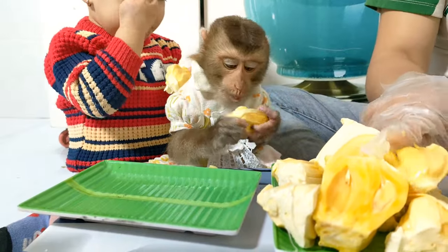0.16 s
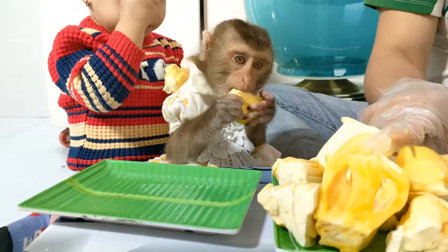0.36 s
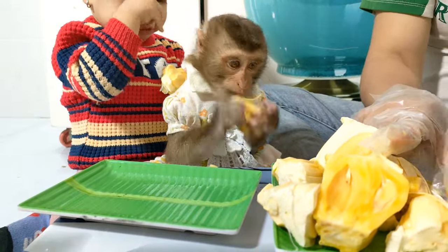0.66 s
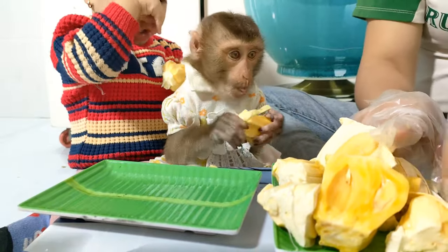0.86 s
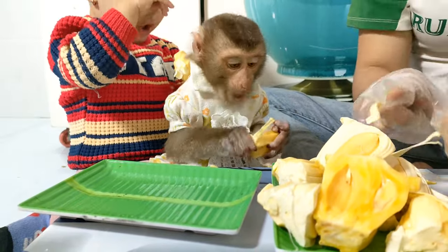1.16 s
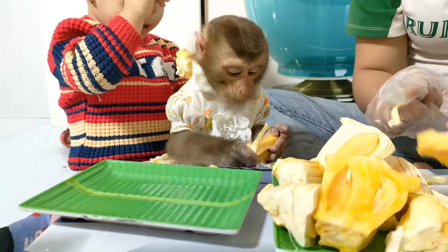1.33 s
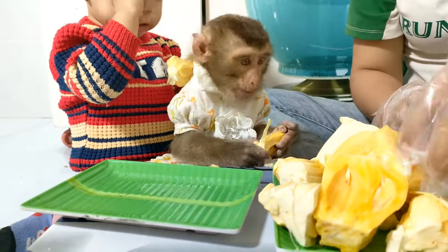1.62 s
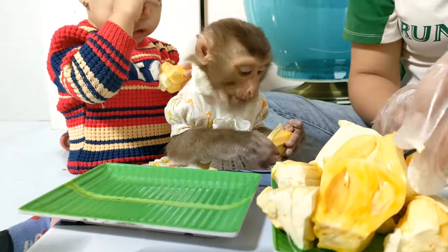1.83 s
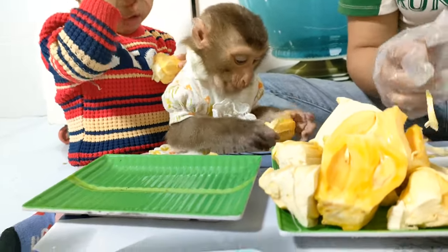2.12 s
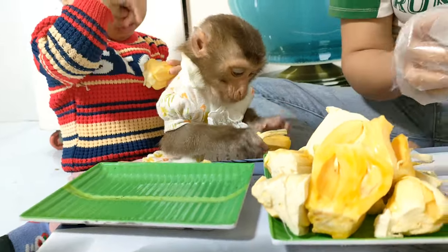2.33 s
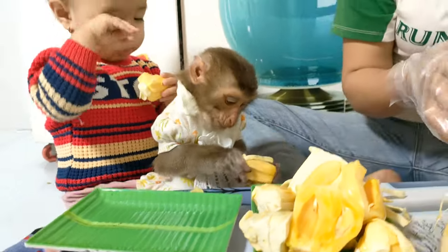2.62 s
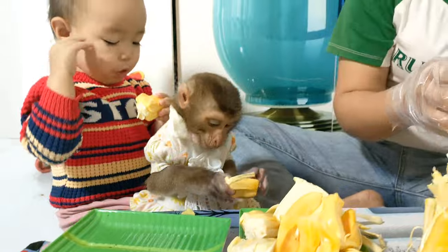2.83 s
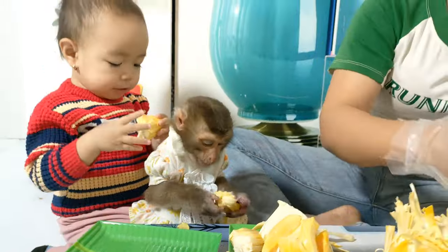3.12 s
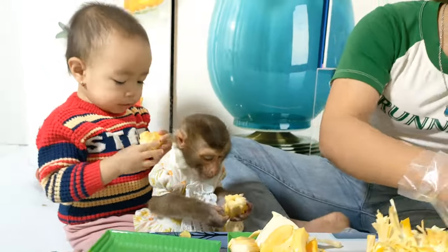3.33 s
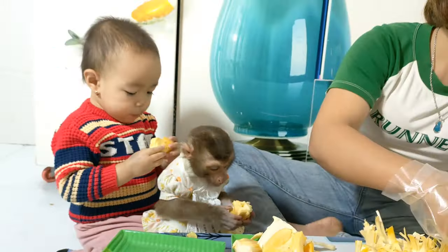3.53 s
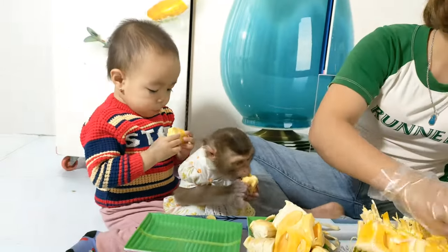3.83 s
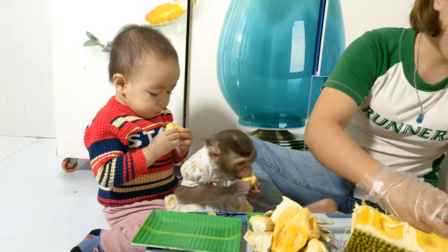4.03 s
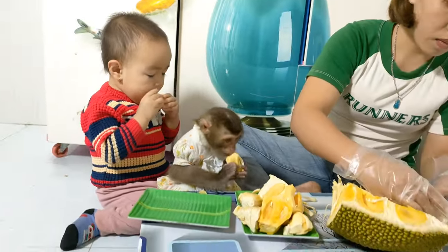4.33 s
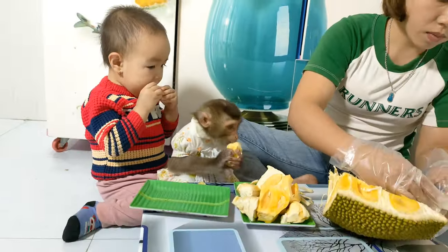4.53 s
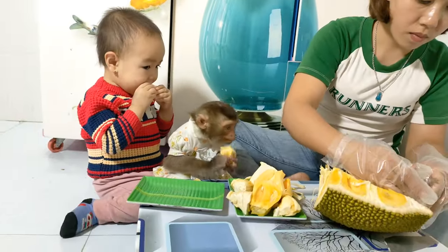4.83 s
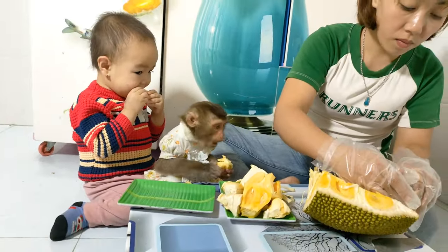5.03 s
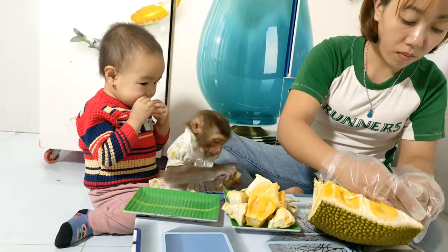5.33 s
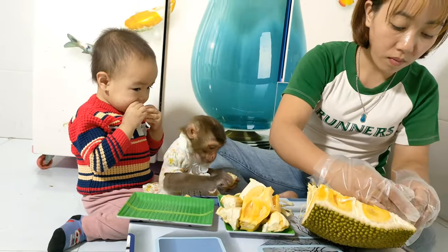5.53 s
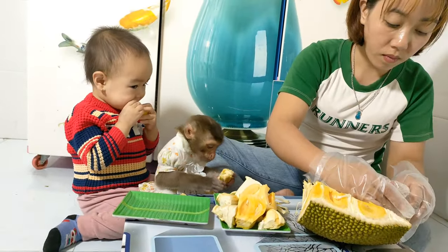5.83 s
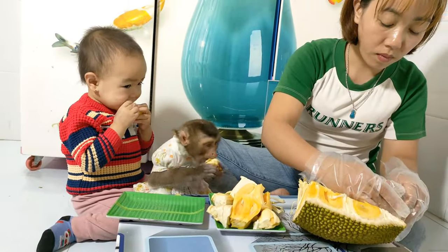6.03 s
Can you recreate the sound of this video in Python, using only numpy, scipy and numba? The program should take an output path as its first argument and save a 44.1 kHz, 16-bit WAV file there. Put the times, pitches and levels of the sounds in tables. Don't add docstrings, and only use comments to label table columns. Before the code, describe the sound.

Irregular crackling of thin plastic film dominates, bright in the low treble but with little high air. Sharp creases snap over softer rustling, fruit and tray bump dully, and sticky fibres release with small pops. The handling is busiest around two to two and a half seconds, then comes in spaced bursts drifting right and quietens before a final crumple. Quiet tiled room, small stereo recorder nearby.

```python
import sys
import numpy as np
from scipy import signal
from scipy.fft import rfft, irfft
from scipy.io import wavfile
from scipy.ndimage import uniform_filter1d
from numba import njit

SR = 44100
rng = np.random.default_rng(int(sys.argv[2]) if len(sys.argv) > 2 else 0)


def gain_from_db(level_db):
    decades = np.asarray(level_db, float) / 20
    return 10 ** decades


def persist_wave(psi):
    counts = np.round(np.clip(psi, -1, 1) * 32767).astype(np.int16)
    wavfile.write(sys.argv[1], SR, np.atleast_2d(counts).T)


N = 271656


def colour(x, points):
    hz, db = np.transpose(points)
    grid = np.linspace(1, SR / 2, 2049)
    ceps = irfft(np.interp(np.log(grid), np.log(hz), db) * np.log(10) / 20)
    ceps[1:2048] *= 2
    ceps[2049:] = 0
    impulse = irfft(np.exp(rfft(ceps)))
    return signal.fftconvolve(x, impulse[None], axes=1)[:, :N]


def band(x, lo_hz, hi_hz):
    sos = signal.butter(2, [lo_hz, min(hi_hz, .45 * SR)], "band", fs=SR, output="sos")
    return signal.sosfilt(sos, x)


def walk(rate):
    hold = int(SR / rate)
    steps = np.repeat(rng.standard_normal(N // hold + 1), hold)
    return uniform_filter1d(steps, hold)[:N]


@njit
def rings(s, hz, t60, size, rise_cycles):
    out = np.zeros(N)
    for k in range(len(s)):
        turn = np.exp(2j * np.pi * hz[k] / SR - np.log(1000) / (t60[k] * SR))
        rise = np.exp(-hz[k] / (rise_cycles * SR))
        lack = 1.
        z = size[k] + 0j
        first = max(int(s[k] * SR), 0)
        for j in range(first, min(N, first + int(t60[k] * SR))):
            out[j] += z.imag * (1 - lack)
            z *= turn
            lack *= rise
    return out


def both_ears(s, hz, t60, size, pan_db, lag_s, detune, rise_cycles):
    chance = rng.standard_normal((len(s), 4)).T
    left_hz = hz * (1 + detune * chance[1])
    right_hz = hz * (1 + detune * chance[3])
    left = rings(s + lag_s * chance[0], left_hz, t60, size * gain_from_db(pan_db / 2), rise_cycles)
    right = rings(s + lag_s * chance[2], right_hz, t60, size * gain_from_db(-pan_db / 2), rise_cycles)
    return np.array([left, right])


def place_db(s):
    # t/s, left minus right/dB
    positions = [
        (0.0, 0),
        (2.3, 1),
        (3.5, -3.5),
        (4.0, -3),
        (5.5, -4),
        (6.16, -9),
    ]
    return np.interp(s, *np.transpose(positions))


def hands():
    # start t/s, length/s, level/dB, tautness/dB
    grips = [(0.0, 0.011, -37.5, -5), (0.137, 0.12, -40, -5), (0.306, 0.055, -39.5, -8.5),
             (0.389, 0.18, -36.5, -6.5), (0.685, 0.1, -39, -9), (0.83, 0.032, -33, -7),
             (0.978, 0.036, -36, -7.5), (1.224, 0.044, -42, -5), (1.366, 0.17, -41.5, -4.5),
             (1.606, 0.22, -44, -9.5), (1.78, 0.17, -44.5, -10.5), (1.987, 0.12, -40.5, -14),
             (2.166, 0.054, -31.5, -20), (2.225, 0.115, -30.5, -14.5), (2.375, 0.32, -40.5, -29),
             (2.579, 0.11, -31, -20), (2.79, 0.28, -40, -16.5), (3.054, 0.08, -37, -10.5),
             (3.168, 0.31, -36, -14.5), (3.54, 0.34, -42.5, -13.5), (3.84, 0.11, -31.5, -11),
             (3.984, 0.16, -35.5, -11.5), (4.187, 0.61, -46, -8.5), (4.516, 0.14, -38.5, -6),
             (4.736, 0.19, -42.5, -8.5), (4.94, 0.18, -46.5, -9.5), (0.572, 0.027, -41.5, -4),
             (5.16, 0.03, -41, -9.5), (5.203, 0.041, -39, -8.5), (5.3, 0.18, -45.5, -4),
             (5.405, 0.18, -45.5, -8.5), (6.093, .04, -56.5, 8), (6.129, 0.049, -35.5, -7.5)]
    attack_s, swell_share, sag_db, release_db_per_s, rest_db = 0.016, 0.18, -0.5, -160, -58
    t = np.arange(0, N, 64) / SR
    start, length, level_db, taut_db = np.array(grips).T[:, :, None]
    since = t - start
    sag = sag_db * np.clip(since / length, 0, 1)
    release = release_db_per_s * np.clip(since - length, 0, None)
    swell = np.clip(since / (attack_s + swell_share * length) + 0.66, 0, 1)
    power = (swell * gain_from_db(level_db + sag + release)) ** 2 + gain_from_db(rest_db) ** 2 / len(grips)
    total = power.sum(0)
    curves = 10 * np.log10(total), (power * taut_db).sum(0) / total
    return [np.interp(np.arange(N) / SR, t, c) for c in curves]


def rustle():
    # f/Hz, level/dB
    mic_response = [(180, -16), (300, -17), (366, -19.5), (720, -15), (937, -5.5), (1510, 1), (2350, 2.5),
                    (2600, 3.5), (3940, 3), (5850, -10.5), (7140, -24), (7880, -30.5), (11100, -30.5),
                    (13600, -40.5), (15500, -37)]
    buckles_per_s = 4000
    level_db, taut_db = hands()
    crisp_db = -23 + 0.34 * taut_db
    flesh_db = -13 - 0.037 * (level_db + 69)
    chance = rng.random((buckles_per_s * N // SR, 4)).T
    at = (chance[0] * N).astype(int)
    hz = 150 + 14500 * chance[1] ** 1.584
    t60 = (5 + 12 * chance[2]) / hz
    pan_db = place_db(at / SR) * np.clip(hz / 2500, 0, 1)
    burst_db = -1.5 * np.log(1 - chance[3]) + 1.87 * walk(140)[at] + 0.91 * walk(24.19)[at]
    size = hz ** 0.73 * gain_from_db(np.minimum(burst_db, 13))
    film = colour(both_ears(at / SR, hz, t60, size, pan_db, .00012, 0.054, 0.25), mic_response)
    film /= band(film.mean(0), 2630, 4340).std()
    body = 0.74 * band(film, 1383, 5010) + 0.29 * band(band(film, 2300, 4610), 2300, 4610)
    flesh = gain_from_db(flesh_db + 16.0) * band(film, 92, 1043)
    taut = gain_from_db(taut_db + 12.5) * band(film, 5410, 8340)
    crisp = gain_from_db(crisp_db + 28.0) * band(film, 9440, 25800)
    return gain_from_db(level_db - 3.0) * (body + flesh + taut + crisp)


def room_tone():
    # f/Hz, level/dB
    hum_spectrum = [(12, -11), (20, 7.5), (124, -5.5), (189, 1.5), (656, -21), (2220, 0), (3650, -2.5),
                    (6180, -14), (8160, -27.5), (11400, -40.5), (15000, -39)]
    mid, side = colour(rng.standard_normal((2, N)), hum_spectrum)
    side = band(side, 870, 14000) + band(side, 32, 49) + 0.72 * side
    tone = np.array([mid + side, mid - side])
    return tone / tone.mean(0).std() * gain_from_db(-57)


def flurries(table, octaves, cycles, shorter_s, gain_db, count):
    s, length, level_db, hz = np.repeat(np.array(table, float), count, axis=0).T
    chance = rng.standard_normal((len(s), 3)).T
    hz = np.clip(hz * 2 ** (octaves * chance[0]), 100, 6800)
    size = gain_from_db(level_db + gain_db + 2.9 * chance[1]) * np.sqrt(length * hz / cycles / count)
    start = s + np.clip(length - shorter_s, 0, None) * .45 * chance[2] - 1.5 / hz
    pan_db = place_db(s) * np.clip(hz / 2500, 0, 1)
    return both_ears(start, hz, cycles / hz, size, pan_db, .00004, 0.0036, 0.68)


def crackles():
    # t/s, length/s, level/dB, centre f/Hz
    early_flurries = [(0.0195, 0.0058, -35, 3500), (0.1651, 0.0051, -37, 4830), (0.1901, 0.0047, -48, 3970),
                      (0.4285, 0.016, -29.5, 3270), (0.452, 0.0042, -30, 3800), (0.4964, 0.0058, -34, 3400),
                      (0.5642, 0.0039, -17.5, 3700), (0.7393, 0.0025, -40, 4180),
                      (0.8476, 0.0055, -28, 3770), (0.8855, 0.0042, -25, 4000),
                      (0.9005, 0.0031, -25.5, 3080), (1.0451, 0.0021, -35, 3800),
                      (1.1659, 0.01, -35.5, 3880), (1.2402, 0.0027, -35, 4640), (1.2546, 0.0031, -33, 3840),
                      (1.3395, 0.0032, -26.5, 4160), (1.3509, 0.0029, -32, 3840),
                      (1.4088, 0.004, -30, 3180), (1.4278, 0.0039, -25.5, 3800),
                      (1.4727, 0.0099, -35, 4300), (1.4886, 0.0065, -30, 4500),
                      (1.547, 0.0035, -27.5, 4380), (1.6014, 0.0027, -46, 4370),
                      (1.6188, 0.0039, -56, 4500), (1.6478, 0.0038, -36, 4000), (1.8278, 0.009, -44, 4270),
                      (1.8862, 0.009, -36.5, 4000), (1.9531, 0.01, -37, 3900), (2.0219, 0.0042, -41, 3080),
                      (2.0294, 0.0063, -28.5, 3580), (2.0818, 0.003, -22.5, 3440),
                      (2.204, 0.0036, -26.5, 3460), (2.2389, 0.0035, -25, 3720),
                      (2.4579, 0.0043, -37, 3240), (2.4789, 0.0088, -34, 3250), (2.5946, 0.0038, -38, 3350),
                      (2.632, 0.01, -25.5, 3140), (2.6819, 0.0063, -33, 3640), (2.6949, 0.0047, -25, 3270),
                      (2.84, 0.0023, -36, 3440), (2.848, 0.0047, -41, 3360), (2.8735, 0.0079, -33, 3350),
                      (2.8859, 0.0025, -50, 3600), (2.9568, 0.007, -34, 3200), (2.9927, 0.005, -45, 3380)]
    deep_flurries = [(3.073, 0.0057, -33, 3630), (3.2095, 0.005, -23.5, 3120), (3.2666, 0.0038, -41, 3630),
                     (3.3045, 0.0031, -36, 3380), (3.3664, 0.0084, -33, 3630), (3.43, 0.01, -37.5, 3550),
                     (3.513, 0.0041, -37.5, 3740), (3.5985, 0.0025, -34, 3600), (3.647, 0.0033, -33, 3770),
                     (3.702, 0.0042, -44, 3760), (3.76, 0.0029, -47, 3270), (3.7734, 0.0048, -39, 3800),
                     (3.8283, 0.0038, -34, 3280), (4.041, 0.0034, -35, 3420), (4.133, 0.0087, -30.5, 3460),
                     (4.215, 0.0036, -35, 3570), (4.291, 0.0048, -36, 3470), (4.3541, 0.0036, -38.5, 3840),
                     (4.459, 0.0064, -34.5, 3740), (4.576, 0.0037, -44, 3740), (4.7696, 0.004, -34, 3830),
                     (4.9133, 0.0056, -43, 3500), (4.9717, 0.0047, -34.5, 3570), (4.986, 0.005, -36, 3300),
                     (5.058, 0.0049, -41, 3500), (5.173, 0.0049, -34, 3620), (5.22, 0.0036, -36, 3600),
                     (5.4377, 0.0053, -33, 3450), (5.4478, 0.0045, -36, 3470), (5.4671, 0.005, -35, 3580),
                     (5.4896, 0.0048, -32, 3700), (5.5314, 0.0066, -37.5, 3490),
                     (5.6831, 0.0047, -43, 3480), (5.7709, 0.0049, -44, 3500), (5.8502, 0.0047, -52, 2770),
                     (5.9704, 0.0049, -44, 2920), (6.142, 0.0056, -32.5, 2870)]
    early = flurries(early_flurries, 0.3, 11.3, .002, 12.4, count=12)
    return early + flurries(deep_flurries, 0.22, 8.1, 0.00088, 14.7, count=16)


def snaps():
    # t/s, peak level/dB, ring f/Hz, crisp top/dB
    crease_flips = [(0.1035, -15.5, 4700, -24), (0.155, -19, 4550, -36), (0.189, -19, 4150, -34),
                    (0.2307, -23.5, 3660, -26), (0.2806, -18.5, 4200, -40), (0.307, -32, 2800, -39),
                    (0.3238, -13.5, 3900, -45), (0.348, -18, 4930, -34), (0.3872, -15.5, 4300, -40),
                    (0.477, -27.5, 2950, -12.5), (0.519, -23, 3360, -44), (0.5619, -24, 3120, -25),
                    (0.7504, -13, 5800, -45), (0.828, -26, 4600, -33), (0.867, -11, 3720, -28),
                    (1, -19.5, 3240, -35), (1.0221, -48, 3170, -36), (1.2083, -23, 4400, -30),
                    (1.231, -21, 4160, -36), (1.3252, -18.5, 4300, -35), (1.4262, -28, 2720, -24),
                    (1.4562, -21, 4400, -29), (1.5122, -20.5, 4640, -29), (1.5351, -17.5, 4640, -40),
                    (1.599, -45, 4600, -23), (1.6158, -15.5, 4270, -41), (1.6771, -21.5, 4000, -46),
                    (1.7868, -42, 3240, -41), (1.972, -21, 3900, -42), (1.992, -16, 4380, -39),
                    (2.0217, -28.5, 2720, -29), (2.0773, -28, 3450, -52), (2.149, -22, 4000, -50),
                    (2.1837, -10, 3900, -49), (2.2373, -11, 4000, -43), (2.286, -13, 3950, -45),
                    (2.368, -19, 3900, -36), (2.4, -12, 3860, -31), (2.5295, -25.5, 2970, -36),
                    (2.6784, -31, 2700, -50), (3.051, -19, 3900, -33), (3.1956, -19, 3230, -26),
                    (3.2345, -17, 3400, -32), (3.266, -17.5, 3400, -35), (3.35, -23, 3650, -33),
                    (3.5095, -31, 3730, -32), (3.7577, -20.5, 3430, -53), (3.826, -36, 3640, -26),
                    (3.8527, -12, 3450, -29), (4.0868, -26, 3600, -33), (4.102, -18.5, 3430, -41),
                    (4.199, -20.5, 3650, -49), (4.2479, -13, 3310, -41), (4.5278, -19, 3870, -41),
                    (4.5745, -39, 3490, -42), (4.76, -23.5, 4000, -37), (5.171, -36, 3660, -51),
                    (5.491, -27.5, 2960, -30), (6.0845, -40, 3970, -20), (6.1247, -22.5, 3400, -27),
                    (0.0626, -27, 4230, -43), (0.1624, -49, 4070, -25), (0.4192, -24, 4080, -48),
                     (0.685, -24, 3400, -52), (0.739, -42, 5670, -51), (0.838, -34, 3300, -32),
                     (0.884, -24, 4500, -46), (0.9656, -32, 4230, -35), (1.149, -29.5, 3930, -30),
                     (1.2515, -31, 3070, -21), (1.338, -29.5, 2800, -16), (1.3926, -30.5, 3030, -20),
                     (1.6457, -33, 4300, -32), (1.747, -39, 4170, -24), (2.0533, -22, 3380, -37),
                     (2.5992, -30, 2660, -44), (2.625, -18, 2580, -56), (2.8387, -30, 3340, -27),
                     (2.872, -46, 3530, -41), (3.1307, -24, 3990, -23), (3.3782, -19, 3660, -38),
                     (3.5701, -24, 3920, -31), (3.6198, -23.5, 3540, -31), (3.9295, -17, 3980, -41),
                     (4.352, -63, 3880, -84), (4.4465, -32, 3460, -41), (4.462, -26.5, 3600, -34),
                     (4.593, -23.5, 3220, -33), (4.6657, -24, 3740, -44), (5.2324, -21, 3460, -40)]
    fold_run_s, edge_db, deep_from_s = 0.0039, 8, 2.1
    creases = np.array(crease_flips, float)
    s, peak_db, hz, crisp_db = np.repeat(creases, 12, axis=0).T
    chance = rng.random((len(s), 4)).T
    later = np.tile(np.arange(12) > 0, len(creases))
    deep = s > deep_from_s
    along = later * chance[0] ** 1.3
    start = s + .0009 + along * fold_run_s
    drop_db = later * (7.5 - 1.8 * deep + 27.0 * chance[1] + 5.3 * along)
    size = gain_from_db(peak_db + 4.5 - 4.3 * deep - drop_db)
    pan_db = place_db(s)
    octaves = later * np.where(deep, .65, 1.22) * (chance[2] - .5)
    fold_hz = np.clip(hz * 2 ** octaves, 1200, 6600)
    fold_t60 = (8 + 8 * later + 5 * deep) / fold_hz
    fold = both_ears(start, fold_hz, fold_t60, size, pan_db + 7.5, .00004, 0.0039, 0.35)
    edge_hz = 9000 + 4500 * chance[3]
    edge_size = size * gain_from_db(crisp_db + edge_db)
    edge = both_ears(start + 0.003 * chance[2], edge_hz, 45 / edge_hz, edge_size, pan_db, 0.00029, 0.066, 1.0)
    return band(band(fold, 1240, 6700), 1240, 6700) + band(edge, 9640, 14600)


def thuds(table, spread, rise_s, rise_cycles):
    s, peak_db, hz, t60, pan_db = np.repeat(np.array(table, float), 3, axis=0).T
    ratio = np.tile([1, 1 / spread, spread], len(table))
    size = gain_from_db(peak_db + np.tile([0, -9, -7], len(table)))
    t60 = np.clip(t60, .005, .5)
    body = both_ears(s + 0.00246, hz * ratio, t60, size, pan_db, .0001, 0.024, rise_cycles)
    rounded = uniform_filter1d(body, max(int(rise_s * SR), 1), axis=1)
    return band(band(rounded, 32, 5100), 32, 5000)


def knocks():
    # t/s, peak level/dB, ring f/Hz, t60/s, left minus right/dB
    contacts = [(0.284, -27, 177.5, 0.1, 0), (0.313, -34.5, 202, 0.1, 0), (0.333, -34, 139, 0.07, -2),
                (0.388, -21.5, 160, 0.049, 1), (0.402, -27, 101, 0.088, -1), (1.149, -22, 337, 0.048, -0.5),
                (1.184, -35, 304, 0.06, 0), (1.529, -50, 266, 0.074, 18), (1.691, -43, 144, 0.1, 7),
                (2.1, -41, 442, 0.16, 0), (2.636, -42, 422, 0.11, 4.5), (2.699, -40, 222, 0.12, 0),
                (3.065, -40, 595, 0.12, 0), (3.309, -40, 165, 0.081, 6), (3.605, -39.5, 302, 0.061, 9),
                (3.649, -46, 258, 0.068, 11), (3.7, -54, 222, 0.25, 9), (3.847, -45, 525, 0.15, 16),
                (4.595, -43.5, 414, 0.21, 1), (5.26, -51, 413, 0.11, 15), (5.844, -45, 200, 0.032, 34),
                (5.983, -60, 181, 0.11, 27.5), (6.136, -39.5, 282, 0.069, 4)]
    return thuds(contacts, 1.49, 0.0011, rise_cycles=1.1)


def tugs():
    # t/s, peak level/dB, ring f/Hz, t60/s, left minus right/dB
    releases = [(0.321, -28, 1845, 0.038, 0), (0.45, -33.5, 920, 0.036, -5),
                (0.882, -31.5, 1660, 0.011, -10), (1.151, -31.5, 583, 0.026, -5),
                (1.172, -38.5, 986, 0.061, -4), (1.338, -30.5, 1430, 0.0044, 12),
                (1.456, -36.5, 997, 0.05, -4), (1.534, -25.5, 1100, 0.012, -3),
                (2.399, -36, 1560, 0.031, -3), (2.505, -42, 1130, 0.021, -9),
                (3.047, -34.5, 1587, 0.043, 1), (3.145, -31, 1404, 0.043, -3),
                (3.318, -38, 1450, 0.013, -25), (3.347, -46.5, 1620, 0.11, 18),
                (3.445, -41, 1090, 0.023, -10), (3.578, -42, 1260, 0.042, -1), (3.853, -27, 1055, 0.027, 1),
                (4.1, -43, 1340, 0.021, -4), (4.821, -34, 1190, 0.025, 2), (4.826, -34, 1500, 0.0098, -7),
                (5.184, -43, 1472, 0.16, -6), (5.755, -40.5, 1470, 0.012, 3),
                (5.848, -32, 1450, 0.0037, 15), (6.122, -41, 1454, 0.07, -3)]
    return thuds(releases, 1.25, .0002, rise_cycles=.5)


def tears():
    # t/s, length/s, level/dB, centre f/Hz
    cracks = [(.483, .012, -29, 4640), (.521, .004, -21.5, 3970), (.531, .012, -33, 3000),
              (.696, .02, -42, 3800), (.828, .003, -26.5, 5160), (1.801, .025, -43, 3600),
              (2.031, 0.033, -35.5, 3400), (2.1, .016, -31.5, 3500), (2.304, 0.01, -21, 3600),
              (2.8, 0.016, -33, 3740), (2.431, .015, -29, 3540), (2.602, .012, -29, 3730),
              (3.058, .012, -28, 3600), (3.382, .008, -35, 3400), (3.931, .012, -33, 3680),
              (4.107, .008, -28, 3500), (4.8, 0.0036, -35, 2040), (4.601, .02, -37, 3600),
              (5.241, .02, -44.5, 3888), (5.851, .0011, -55, 2100)]
    return flurries(cracks, 0.24, 19.5, 0, 9.4, count=30)


def rubs():
    # t/s, length/s, level/dB, centre f/Hz
    slides = [(.6, 0.19, -62.5, 246), (1.11, 0.061, -58.5, 950), (1.24, 0.059, -56.5, 1040),
              (1.43, 0.16, -66.5, 249), (1.165, 0.035, -46.5, 209), (1.72, 0.083, -64, 378),
              (3.65, .08, -56, 261), (2.03, 0.092, -62.5, 610), (2.68, 0.069, -60, 580),
              (3.2, 0.24, -64, 290), (4.3, .1, -60, 1160), (4.42, 0.13, -56, 1156), (5.46, 0.028, -71, 710),
              (5.995, 0.0094, -72, 710)]
    return flurries(slides, 0.13, 32, 0, 17.0, count=30)


def squeak():
    # t/s, pitch f/Hz, level/dB
    glide = [
        (6.08, 3830, -58),
        (6.089, 3960, -43.5),
        (6.129, 4410, -63),
    ]
    s, hz, level_db = np.transpose(glide)
    t = np.arange(N) / SR
    gate = uniform_filter1d(1. * ((t > s[0]) & (t < s[-1])), int(0.0037 * SR))
    tone = np.sin(2 * np.pi * np.cumsum(np.interp(t, s, hz)) / SR)
    lean_db = np.array([[-1.5], [1.5]])
    return gate * gain_from_db(np.interp(t, s, level_db) + 4.0 + lean_db) * tone


def room(dry, wet_db):
    t60_s = 0.39
    t = np.arange(int(.6 * SR)) / SR
    decay = 1000 ** (-t / t60_s) * np.clip(t / 0.0007, 0, 1)
    noise = rng.standard_normal((3, len(t))) * decay
    common, own = noise[0], noise[1:]
    tail = band(common, 57, 825) + band(own, 1400, 11200) + .5 * band(own, 110, 1350)
    tail /= np.sqrt(np.sum(tail ** 2, axis=1, keepdims=True))
    return dry + gain_from_db(wet_db) * signal.fftconvolve(dry, tail, axes=1)[:, :N]


def scene():
    far = rustle() + tugs() + rubs() + squeak()
    near = crackles() + snaps() + knocks() + tears()
    return room(far, wet_db=-5) + room(near, wet_db=-9) + room_tone()


def band_limit(x):
    return signal.sosfilt(signal.butter(12, 15710, fs=SR, output="sos"), x)


def record(dry):
    notch_hz, notch_width_hz, notch_depth_db, left_treble_db = 7770, 950, -7.5, 11.5
    hz = np.fft.rfftfreq(N, 1 / SR)
    notch_db = notch_depth_db * np.exp(-((hz - notch_hz) / notch_width_hz) ** 2)
    lean_db = left_treble_db * np.clip(hz / 8000, 0, 1.3) * np.array([[.5], [-.5]])
    mix = irfft(rfft(dry) * gain_from_db(notch_db + lean_db), N)
    return band_limit(mix)


dry = scene()
out = record(dry)
persist_wave(out)
```